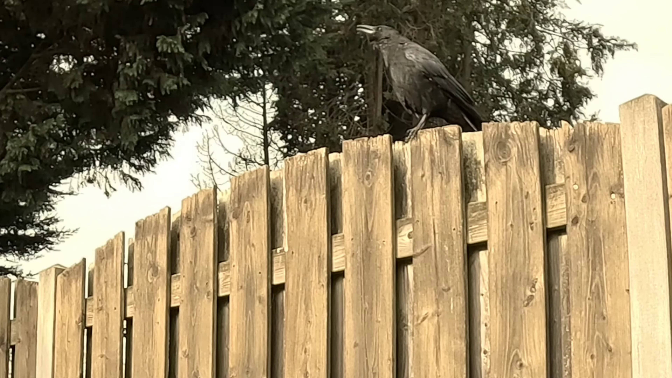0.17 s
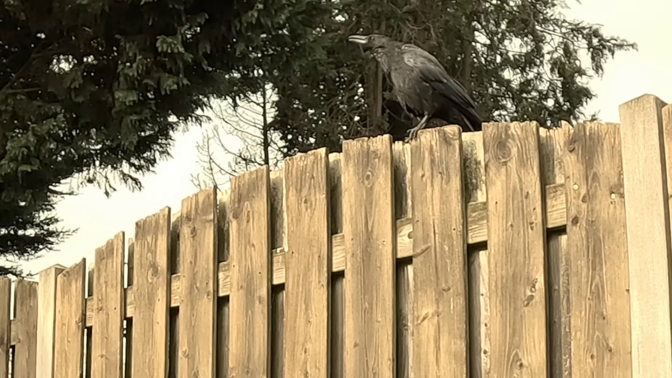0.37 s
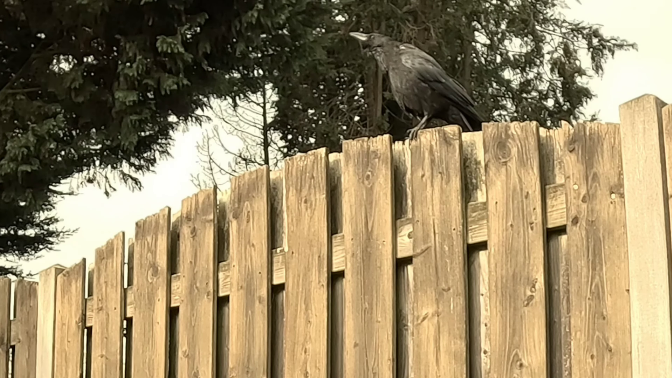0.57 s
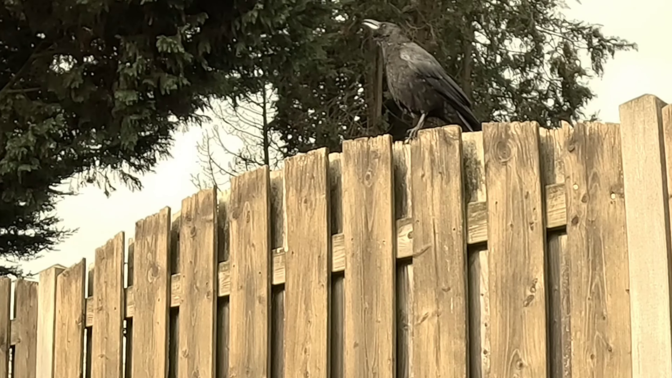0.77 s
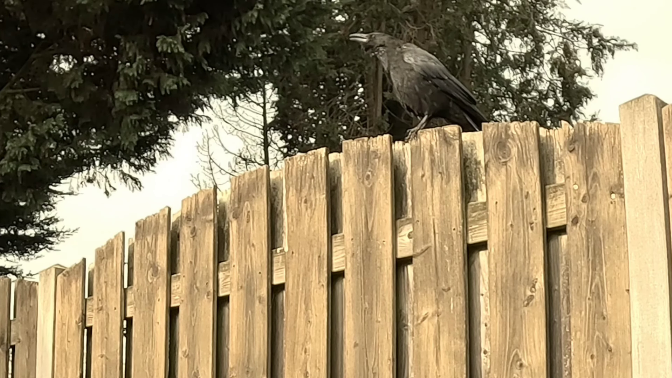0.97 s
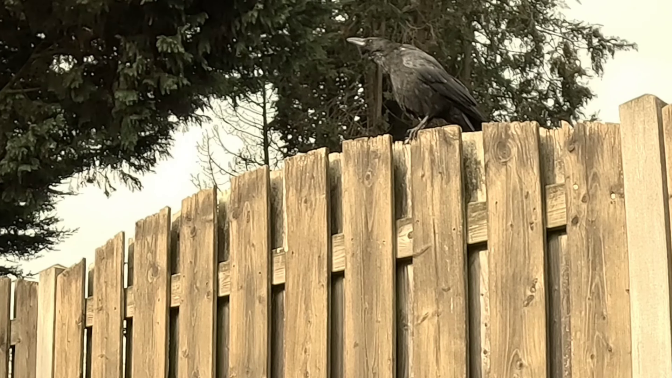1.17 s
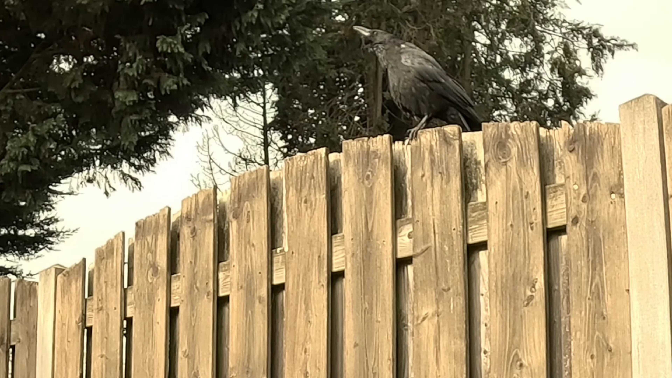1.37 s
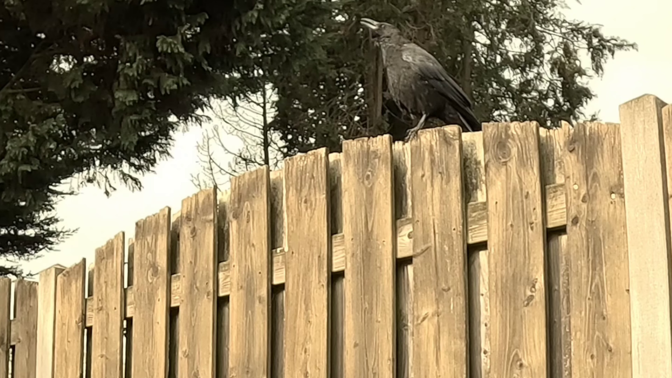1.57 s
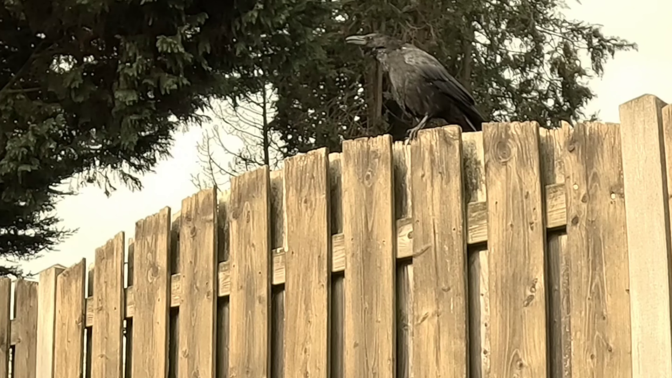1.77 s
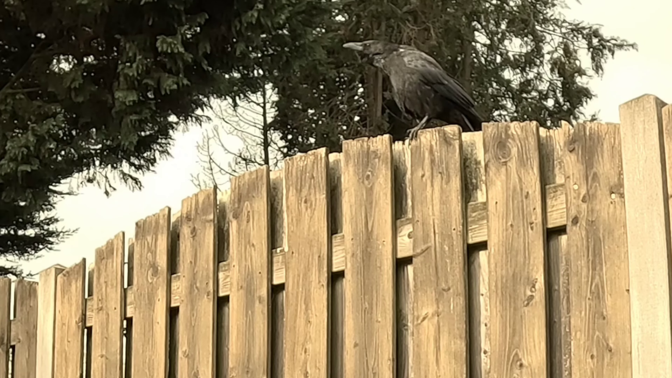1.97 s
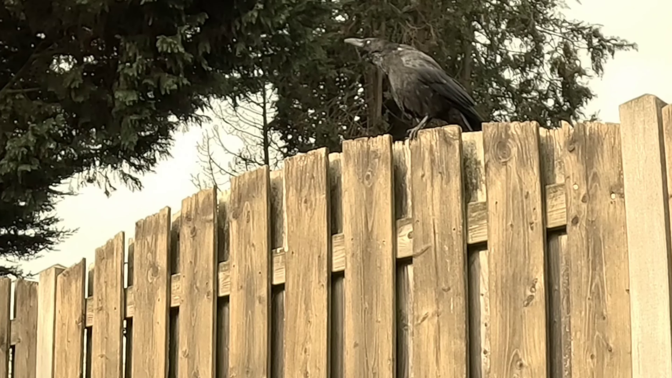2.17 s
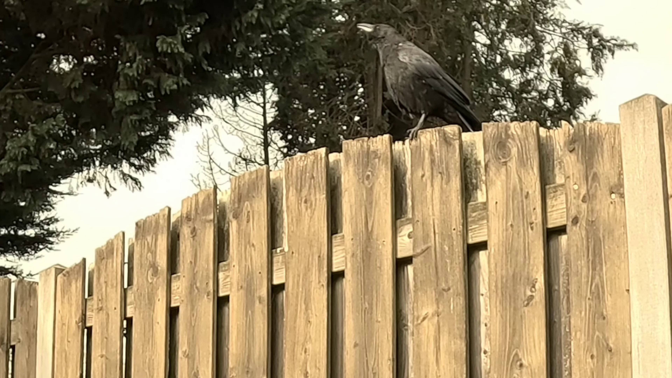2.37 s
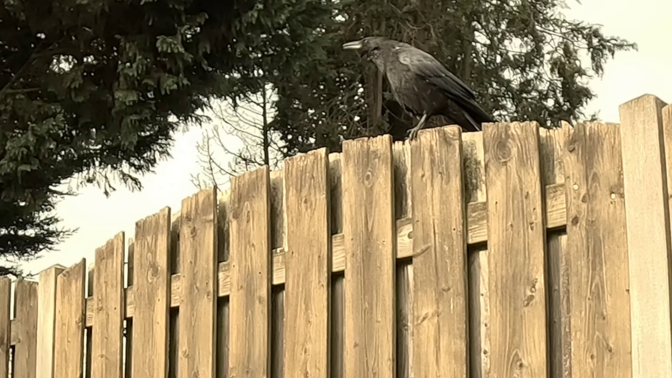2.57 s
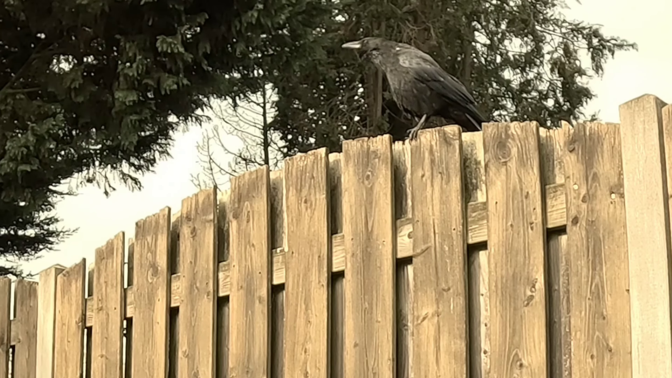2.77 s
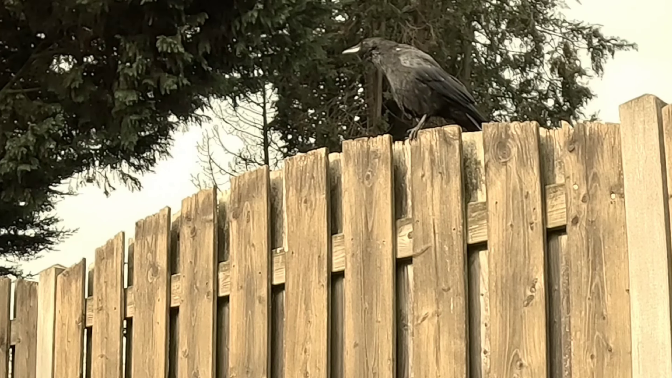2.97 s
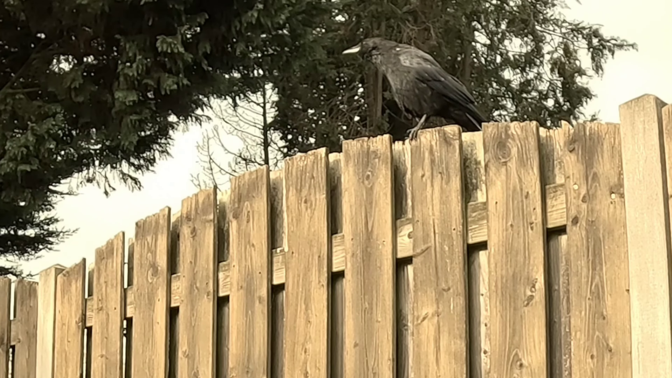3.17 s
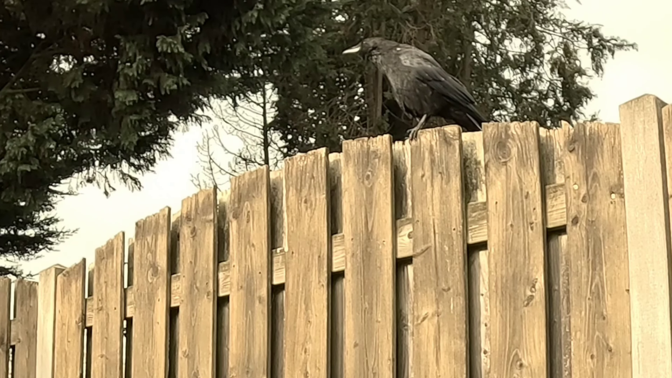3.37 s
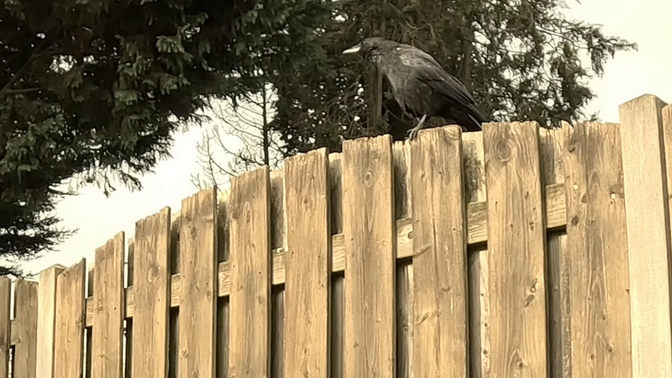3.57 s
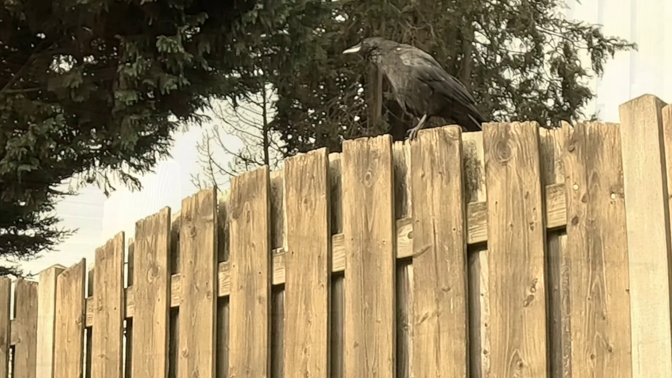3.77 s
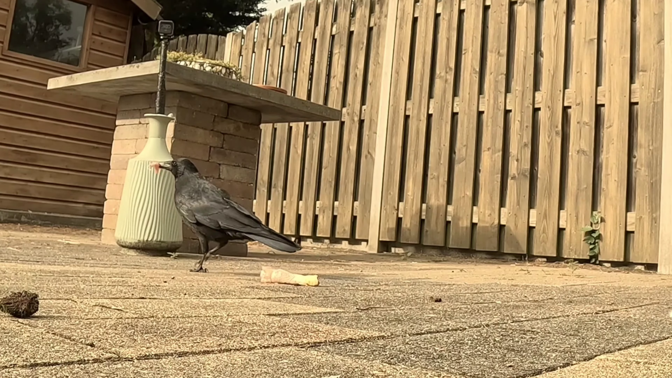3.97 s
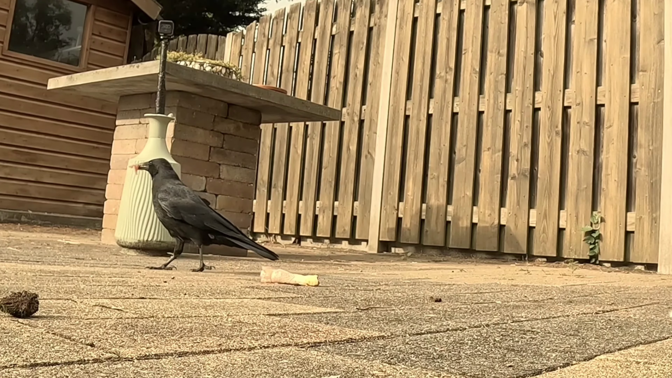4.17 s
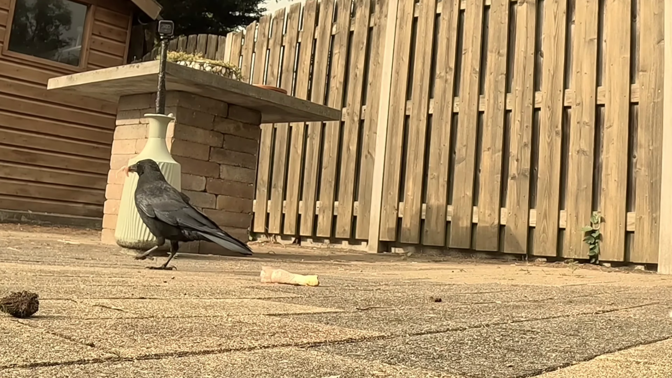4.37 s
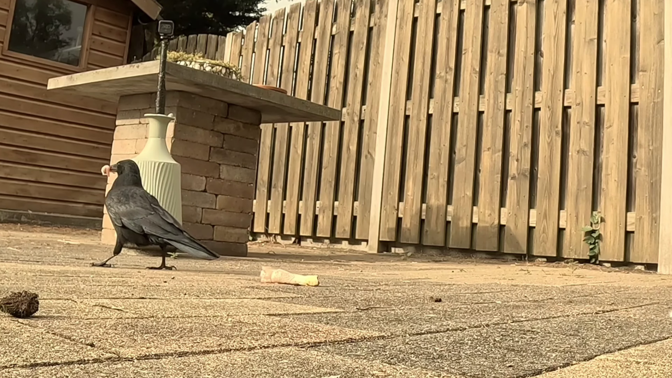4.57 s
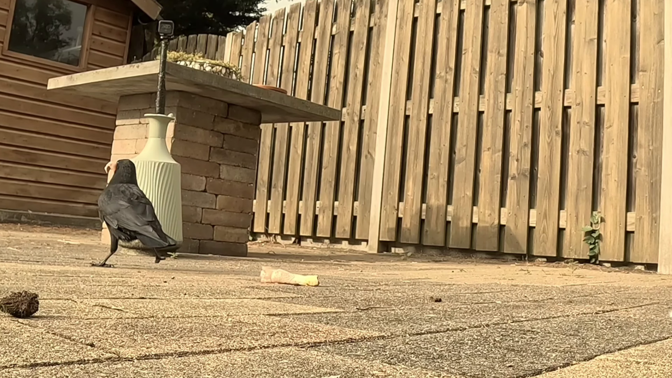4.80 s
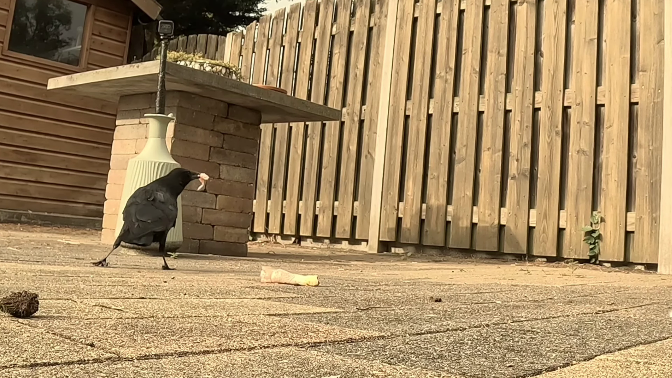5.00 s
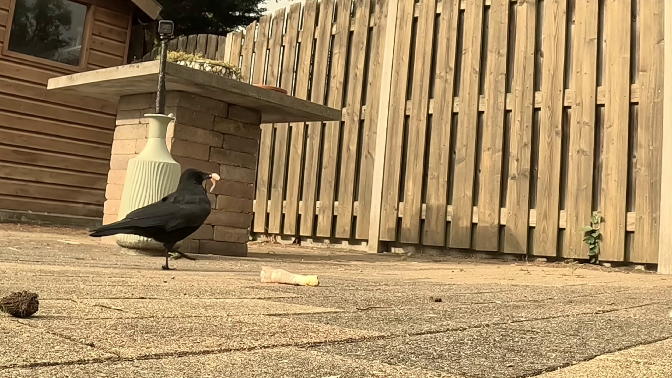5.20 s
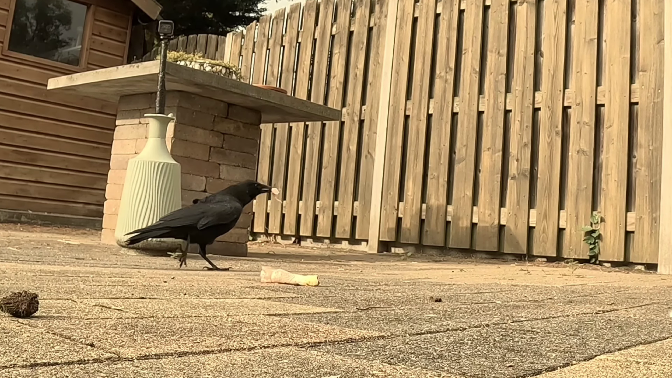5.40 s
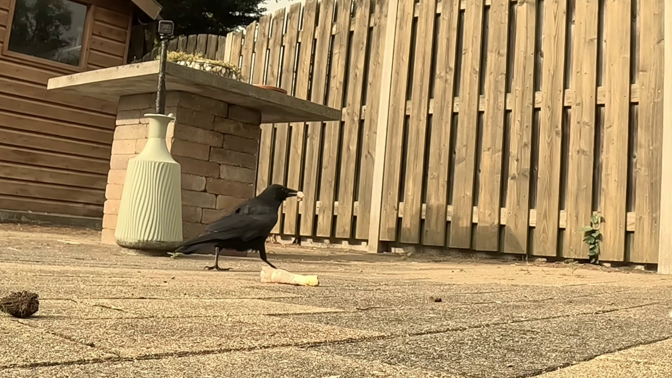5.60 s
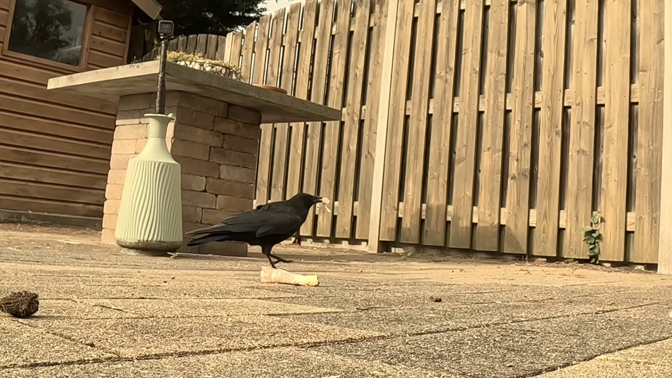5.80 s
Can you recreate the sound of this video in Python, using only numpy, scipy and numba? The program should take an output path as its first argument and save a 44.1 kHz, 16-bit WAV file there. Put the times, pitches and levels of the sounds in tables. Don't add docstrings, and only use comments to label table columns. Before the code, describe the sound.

Raspy, fluttering crow caws echo off fence and house, with a brief wind thump, tiny rustles and a sharp claw click.

```python
import sys
import numpy as np
from scipy import signal
from scipy.fft import rfft, irfft
from scipy.io import wavfile
from scipy.ndimage import uniform_filter1d
from numba import njit

SR = 44100
rng = np.random.default_rng(int(sys.argv[2]) if len(sys.argv) > 2 else 0)


def attenuation_scalar(level_db):
    decades = np.asarray(level_db, float) / 20
    return 10 ** decades


def dump(signal):
    limited = np.clip(np.atleast_2d(signal).T, -1, 1)
    pcm = np.round(limited * 32767).astype(np.int16)
    wavfile.write(sys.argv[1], SR, pcm)


N = 257544

# start in seconds, length in seconds, level in dB, pulse rate in Hz,
# seconds until the beak is half open.
CAWS = [
    (0.052, .383, -20.5, 426.2, 0.19),
    (0.754, 0.36, -25, 405, 0.14),
    (1.533, 0.39, -22, 409.8, 0.16),
    (2.361, 0.39, -18.5, 430.4, 0.19),
    (5.077, 0.37, -20, 423.4, .19),
    (5.776, 0.31, -25, 403.8, .18),
]


def level(x):
    return x / np.sqrt(np.mean(x ** 2))


def ramp(x):
    return np.clip(x, 0, 1)


def walk(rate):
    hold = int(SR / rate)
    steps = np.repeat(rng.standard_normal(N // hold + 1), hold)
    return 1.286 * uniform_filter1d(uniform_filter1d(steps, hold), hold)[:N]


def coloured(points):
    hz, db = np.transpose(points)
    log_hz = np.log(np.fft.rfftfreq(N, 1 / SR) + 1)
    shape_db = np.interp(log_hz, np.log(hz), db, left=-200, right=-200)
    return level(irfft(rfft(rng.standard_normal(N)) * attenuation_scalar(shape_db), N))


@njit
def svf(x, hz, width):
    out, band, low = np.empty(len(x)), 0., 0.
    for i in range(len(x)):
        g, k = np.tan(np.pi * hz[i] / SR), width / hz[i]
        v = (band + g * (x[i] - low)) / (1 + g * (g + k))
        band, low = 2 * v - band, low + 2 * g * v
        out[i] = k * v
    return out


def ring(x, hz, width_hz, db=0):
    hz = hz + np.zeros(N)
    return attenuation_scalar(db) * svf(svf(x, hz, 1. * width_hz), hz, 1.6 * width_hz)


def gesture():
    # rasp in dB, widest beak resonance in Hz, seconds until the pitch sags,
    # sag as a share per second, air in the chest in dB.
    posture = [(3.5, 3150, .16, .68, -2.5), (3, 2960, .19, .58, -14.5), (2.5, 2950, .18, .70, -11),
               (0.5, 3110, .14, .52, -0.5), (-0.5, 3160, .15, .54, -2.5), (0, 2800, .16, .55, -9.5)]
    # chest with beak shut in dB, chest with beak wide in dB,
    # upper throat shut in dB, upper throat wide in dB, low throat wide in dB.
    balance = [(-22, -11, -3, 6.5, -8.5), (-8, -9, -0.5, 7.5, -3), (-16, -9.5, -3, 7, -7),
               (-25.5, -12.5, -9, 5.5, -10), (-20, -11, -13.5, 7, -10.5), (-13.5, -11, -15, -1.5, -5.5)]
    # level shut in dB, level wide in dB.
    opening_rasp_db = (-29.5, -16)

    t = np.arange(N) / SR
    which = np.clip(np.searchsorted(np.transpose(CAWS)[0], t) - 1, 0, None)
    start, length, caw_db, pitch_hz, open_s = np.array(CAWS)[which].T
    rasp_db, wide_hz, sag_s, sag, air_db = np.array(posture)[which].T
    chest_shut, chest_wide, upper_shut, upper_wide, low_wide = np.array(balance)[which].T
    since, left = t - start, start + length - t

    slack_share, catch_share, let_go_share = .67, .84, .55
    tension = slack_share + (catch_share - slack_share) * ramp(since / .018)
    tension = tension + (1 - catch_share) * ramp((since - .031) / .007)
    tension = tension - sag * np.clip(since - sag_s, 0, length - sag_s)
    hz = pitch_hz * tension * (1 - (1 - let_go_share) * ramp(1 - left / .045))

    def between(shut, wide, lag_s=0):
        opening_s = .08
        return shut + (wide - shut) * (.5 + .5 * np.tanh((since - open_s - lag_s) / opening_s))

    slack = ramp(1 - since / 0.028)
    db = caw_db + between(0, low_wide, .03) - 16.5 * slack - 8 * ramp(1 - left / 0.065)
    chest_db = between(chest_shut, chest_wide) + 14.5 * slack
    upper_db = between(upper_shut, upper_wide) - 3.5 * slack
    beak_hz = between(2487, wide_hz)
    rasp_db = rasp_db + between(*opening_rasp_db, -0.068) + 6.5 * slack
    return hz, db, chest_db, upper_db, beak_hz, rasp_db, air_db, (since > 0) & (left > 0)


@njit
def fire(hz, stretch, size):
    pulses, phase, p, k = np.zeros(len(hz) + 1), np.empty(len(hz)), 0., 0
    for i in range(len(hz)):
        step = hz[i] * stretch[k] / SR
        p += step
        if p >= 1:
            p, k = p - 1, k + 1
            pulses[i] += size[k] * p / step
            pulses[i + 1] += size[k] * (1 - p / step)
        phase[i] = p
    return pulses[:-1], phase


def syrinx(hz, wide):
    flutter_hz, flutter_bend, wobble = 46, .042, .005
    jitter, shimmer_db, breath_db = .011, 1.7, -16.5
    depth = .33 + .8 * wide
    beat = 2 * np.pi * np.cumsum(flutter_hz * (1 + .25 * walk(25))) / SR
    bend = 1 + flutter_bend * depth * np.sin(beat) + wobble * walk(60)
    chance = rng.standard_normal((N // 50, 2)).T
    pulses, phase = fire(hz * bend, 1 + jitter * chance[0], attenuation_scalar(shimmer_db * chance[1]))
    gate = 1.02 + np.exp(-phase / .4)
    slack_db = np.clip((385 - hz) / 5, 0, 17)
    breath = attenuation_scalar(breath_db + slack_db) * level(gate * rng.standard_normal(N))
    return level(pulses - pulses.mean()) + breath, gate, beat


def air_sac(source, gate, hz, wide, air_db):
    tone = level(ring(source, 2 * hz, 150) + ring(source, hz, 150, -17))
    air = level(ring(gate * rng.standard_normal(N), 2.05 * hz, 270))
    return tone + attenuation_scalar(air_db) * (1 - wide) * air


def windpipe(source, wide):
    # centre in Hz, width in Hz.
    low_throat = (1229, 194)
    # centre in Hz, width in Hz, level in dB.
    high_throat = [(1710, 630, 4.5), (2052, 630, 3)]
    low = level(ring(source, low_throat[0] - 170 * wide, low_throat[1]))
    upper, sign = 0, 1
    for hz, width_hz, db in high_throat:
        upper = upper + sign * ring(source, hz - 190 * wide, width_hz, db)
        sign = -sign
    return low, level(upper)


def throat_rasp(source, gate, wide):
    # centre in Hz, width in Hz, level in dB.
    shut_mode = (7050, 800, 0)
    # centre in Hz, width in Hz, level in dB.
    wide_mode = (5400, 1200, -1)
    # centre in Hz, width in Hz, level in dB.
    top_modes = [(4760, 740, -10.5), (6500, 3600, -10), (10440, 3100, -27.5), (12500, 2000, -21.5)]
    shares = [1 - wide, wide] + [1] * len(top_modes)
    rasp = 0
    for share, mode in zip(shares, [shut_mode, wide_mode, *top_modes]):
        turbulence = gate * rng.standard_normal(N) + 0.13 * source
        rasp = rasp + share * ring(turbulence, *mode)
    return level(rasp)


def throat_snap():
    t = np.arange(N) / SR
    puff = sum((t > caw[0]) * np.exp(-np.abs(t - caw[0]) / 0.013) for caw in CAWS)
    return attenuation_scalar(-54) * puff * level(ring(rng.standard_normal(N), 2800, 880))


def crow():
    hz, db, chest_db, upper_db, beak_hz, rasp_db, air_db, sounding = gesture()
    wide = np.clip((beak_hz - 2500) / 500, .1, .9)
    source, gate, beat = syrinx(hz, wide)
    chest = air_sac(source, gate, hz, wide, air_db)
    low, upper = windpipe(source, wide)
    beak_db = -7 - 5 * (1 - wide) + upper_db / 2
    beak = level(ring(source, beak_hz, 400)) * attenuation_scalar(beak_db)
    rasp = throat_rasp(source, gate, wide)

    shake = []
    for lag in (1.1, 2.6, 4.1):
        grip = np.clip(.6 + .5 * walk(20), 0, 1.4)
        shake.append(attenuation_scalar(-3.0 * (1 + np.cos(beat + lag)) ** 2 * grip + 1.4 * walk(70)))
    voice = shake[0] * low - attenuation_scalar(chest_db) * chest - shake[1] * attenuation_scalar(upper_db) * upper
    voice = voice + shake[2] * beak + np.sqrt(shake[2]) * attenuation_scalar(rasp_db) * rasp
    pocket = svf(voice, 3680 + np.zeros(N), 1700.)
    voice = voice - 0.49 * (1 - .5 * wide) * pocket
    effort = attenuation_scalar(db - 1.44) * uniform_filter1d(1. * sounding, size=90)
    return effort * voice + throat_snap()


@njit
def walls(x, lags, gain, damp):
    line, soft, out = np.zeros((8, 4096)), np.zeros(8), np.zeros(len(x))
    for i in range(len(x)):
        total = 0.
        for k in range(8):
            soft[k] += (1 - damp) * (gain[k] * line[k, (i - lags[k]) & 4095] - soft[k])
            total += soft[k]
        out[i] = soft[0] - soft[3] + soft[5] - soft[6]
        for k in range(8):
            line[k, i & 4095] = x[i] + soft[k] - total / 4
    return out


def yard(voice):
    # delay in seconds, level in dB.
    echoes = [(.0043, -51), (0.0118, -3.5), (.023, -13)]
    # centre in Hz, width in Hz, level in dB.
    corner = [(1600, 520, 6), (2550, 900, 0), (5000, 3000, -2)]
    t60_s, damp, ring_db = 0.48, 0.12, -19.5
    near = voice + sum(attenuation_scalar(db) * np.pad(voice, (int(s * SR), 0))[:N] for s, db in echoes)
    lags = np.array([787, 1031, 1327, 1613, 1973, 2381, 2797, 3301])
    send = 1.61 * near + sum(ring(near, *band) for band in corner) + 1e-18
    return near + attenuation_scalar(ring_db) * walls(send, lags, attenuation_scalar(-60 * lags / SR / t60_s), damp)


def small_sounds():
    # time in seconds, length in seconds, level in dB, centre in Hz.
    rustles = [(1.949, 0.026, -68.5, 9900), (2.03, .015, -67.5, 4950), (2.23, 0.049, -64.5, 3120),
               (2.3, 0.051, -76.5, 5000), (3.303, 0.032, -82, 6086), (3.447, 0.019, -82, 6990),
               (3.528, .03, -84, 6030), (3.746, 0.018, -81, 6500), (3.779, 0.018, -75, 8900),
               (4.55, 0.029, -85.5, 4030), (2.215, 0.015, -52.5, 437), (2.216, 0.023, -59, 1360),
               (2.222, 0.022, -67.5, 12200), (3.771, 0.0182, -65.5, 1770)]
    # time in seconds, peak in dB, centre in Hz.
    ticks = [
        (3.4544, -68, 4920),
        (3.7254, -65, 6100),
        (3.7654, -56, 5740),
        (3.7698, -52, 6090),
        (3.7784, -55, 5270),
        (3.7823, -39.5, 12400),
    ]
    t, out = np.arange(N) / SR, 0
    grain = level(rng.standard_normal(N) * attenuation_scalar(1.9 * walk(530)))
    for s, length, db, hz in rustles:
        swell = np.exp(-.5 * ((t - s) / length) ** 2)
        out = out + attenuation_scalar(db) * swell * level(ring(grain, hz, 1.4 * hz))
    for s, db, hz in ticks:
        decay = (t > s) * np.exp(-np.clip(t - s, 0, None) / 0.00062)
        out = out + attenuation_scalar(db) * decay * level(ring(grain, hz, 0.9 * hz))
    return out


def wind():
    t = np.arange(N) / SR
    gust_s, rise_s, hold_s, fall_s = 1.645, 0.049, 0.34, .13
    gust = ramp((t - gust_s) / rise_s) * ramp(1 + (gust_s + rise_s + hold_s - t) / fall_s)
    buffet = gust ** 2 * attenuation_scalar(-41) * coloured([(12, 23.0), (30, 2), (60, -14.5), (120, -29.0)])
    thump_s, thump_rise_s, thump_fall_s = 1.995, 0.0055, 0.0105
    u = (t - thump_s) / thump_rise_s
    fade = np.where(u < 0, (u / 1.94) ** 2, np.abs(t - thump_s) / thump_fall_s)
    return buffet + attenuation_scalar(-6.5) * np.tanh(u) * np.exp(-fade)


def traffic():
    # frequency in Hz, level in dB per Hz.
    rumble = [(8.8, -56), (15, -10), (54, 1), (110, -8.5), (140, -40.5), (240, -120)]
    hum = [(65, -43.5), (110, -20), (119, -2.5), (140, -1.5), (188, 1.5), (300, -14.5), (390, -31.5),
           (660, -120)]
    hiss = [(180, -33.5), (300, -5.5), (687, -15.5), (779, -12.5), (841, -19.5), (1110, -17), (1780, -27.5),
            (2200, -34.5), (3000, -40.5), (3900, -60.5), (6600, -120)]
    air = [(1760, -21.5), (3000, -4.5), (4790, -2.5), (5230, -2.5), (5800, -4.5), (9260, -15.5),
           (12300, -19), (15500, -19)]
    floor_db = (-52.5, -59, -63.5, -85)
    follows = (0.13, 1.05, 0.48, .05)
    # time in seconds, level in dB.
    swell = [(0, 8), (.3, -1.5), (1.5, 1), (2.1, 3.5), (2.9, 0.5), (3.78, 0.5), (3.95, 8.5), (4.9, 11.5),
             (5.84, 7)]
    swell_s, swell_db = np.transpose(swell)
    traffic_db = np.interp(np.arange(N) / SR, swell_s, swell_db)
    flicker_db, flicker_hz = (4.3, 0.53, 1.1, 1.1), (3.7, 3.5, 35, 5.3)
    out = 0
    for db, share, colour, spread_db, rate in zip(floor_db, follows, (rumble, hum, hiss, air),
                                                  flicker_db, flicker_hz):
        out = out + coloured(colour) * attenuation_scalar(db + share * traffic_db + spread_db * walk(rate))
    return out


def motor():
    # pitch in Hz, level in dB, stop in seconds.
    tones = [(800, -75, 3.84), (196, -64, 3.84)]
    t, out = np.arange(N) / SR, 0
    for hz, db, stop in tones:
        strength = np.sqrt(2) * attenuation_scalar(db + 4.6 * walk(1.9))
        phase = 2 * np.pi * np.cumsum(hz * (1 + 0.0004 * walk(15))) / SR
        out = out + strength * np.sin(phase) * (t < stop)
    return out


def scene():
    return (yard(crow()) + small_sounds() + wind() + traffic() + motor())[None, :]


def low_pass(x):
    return signal.sosfilt(signal.butter(12, 15680, fs=SR, output="sos"), x)


def record(dry):
    mix = np.tanh(dry)
    mix = signal.sosfilt(signal.butter(1, 8, "high", fs=SR, output="sos"), mix)
    mix = signal.sosfilt(signal.butter(3, 14800, fs=SR, output="sos"), mix)
    mix = signal.sosfilt(signal.ellip(8, .2, 70, 15650, fs=SR, output="sos"), mix)
    return low_pass(mix)


dry = scene()
out = record(dry)
dump(out)
```